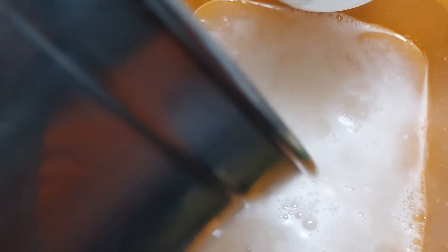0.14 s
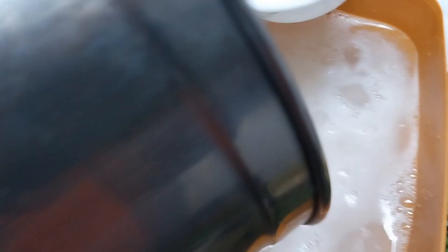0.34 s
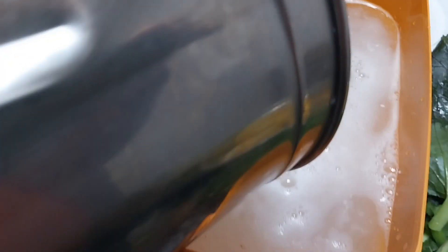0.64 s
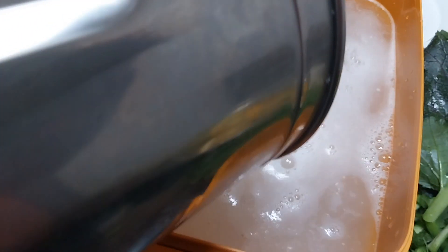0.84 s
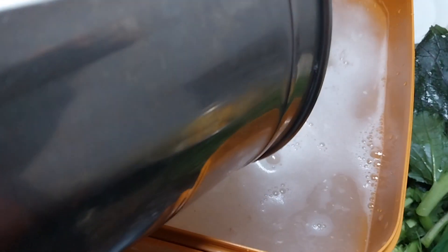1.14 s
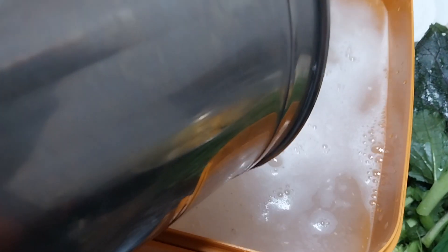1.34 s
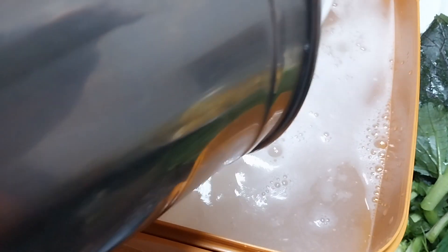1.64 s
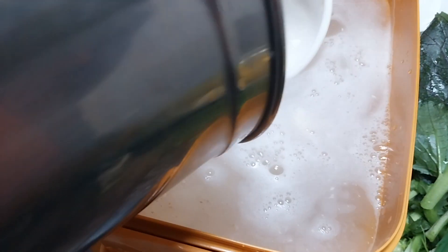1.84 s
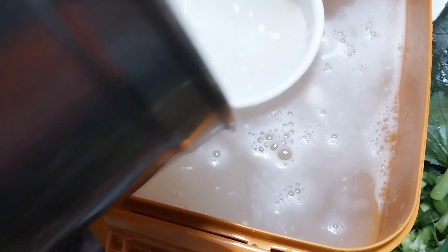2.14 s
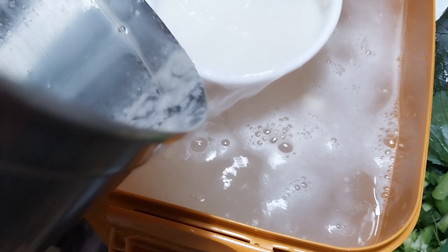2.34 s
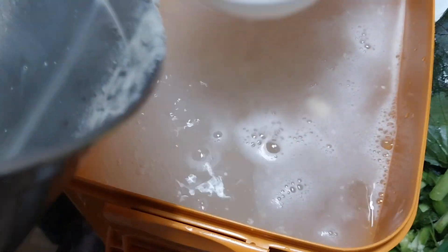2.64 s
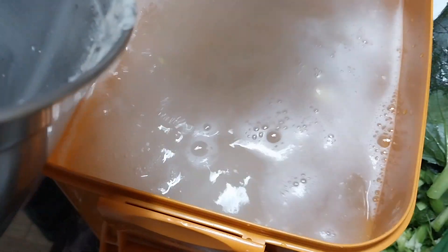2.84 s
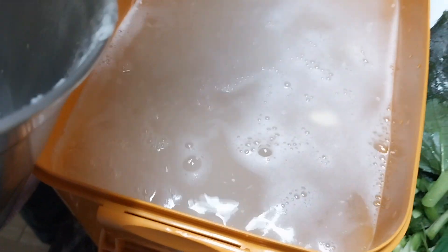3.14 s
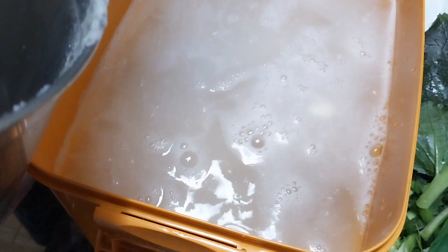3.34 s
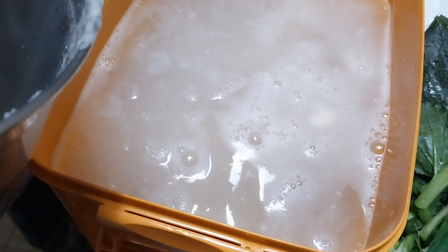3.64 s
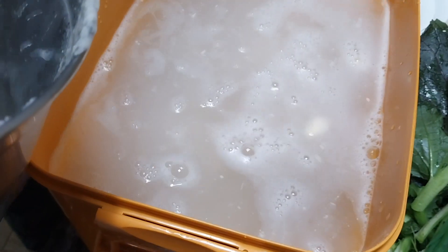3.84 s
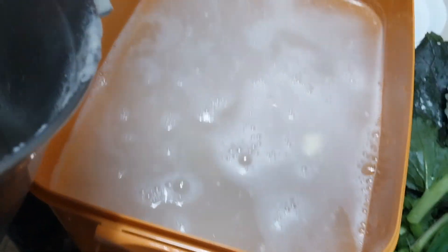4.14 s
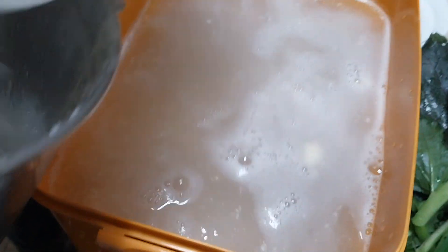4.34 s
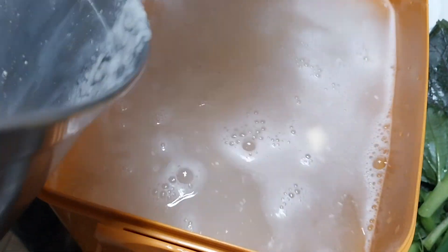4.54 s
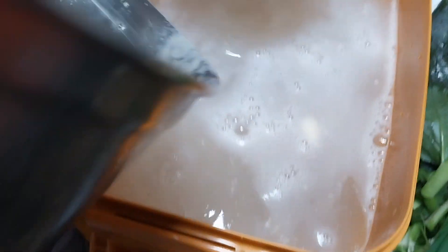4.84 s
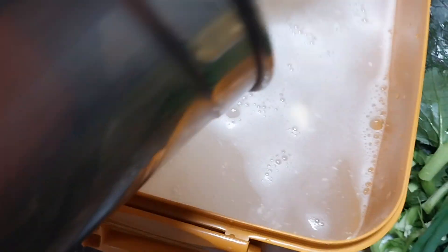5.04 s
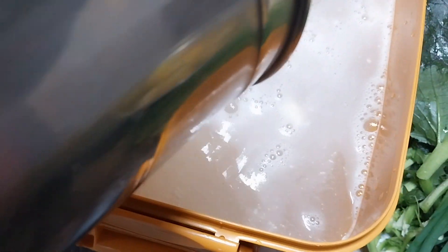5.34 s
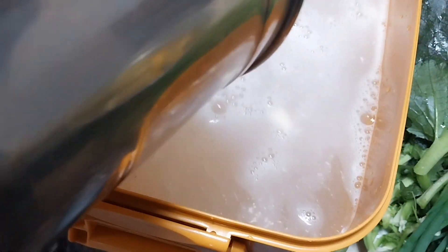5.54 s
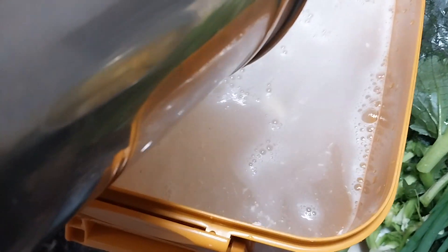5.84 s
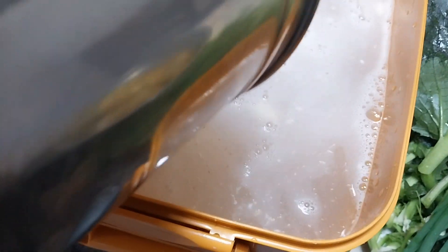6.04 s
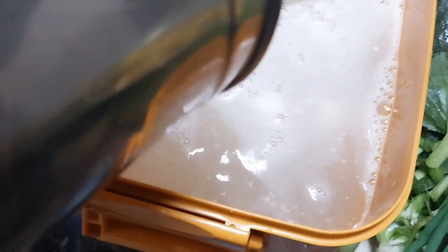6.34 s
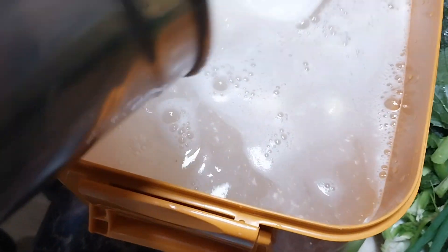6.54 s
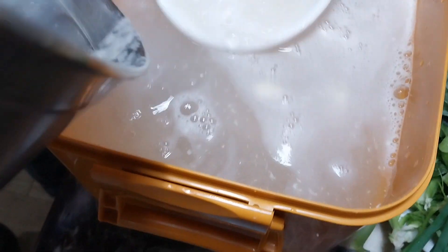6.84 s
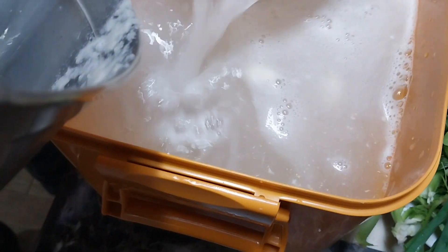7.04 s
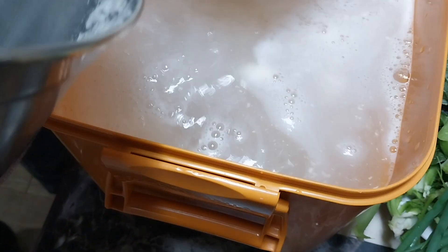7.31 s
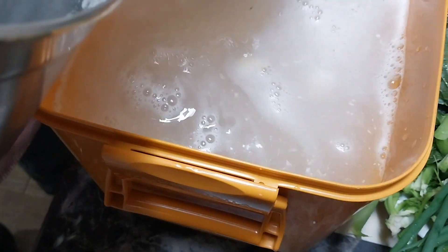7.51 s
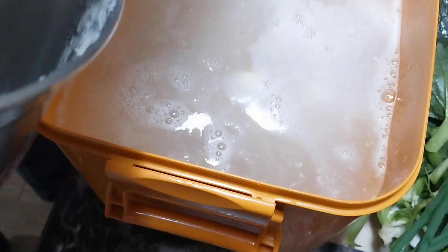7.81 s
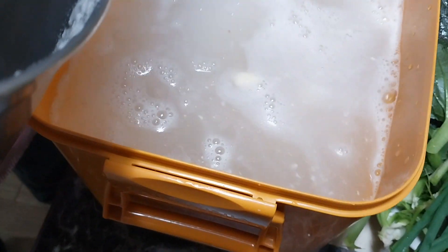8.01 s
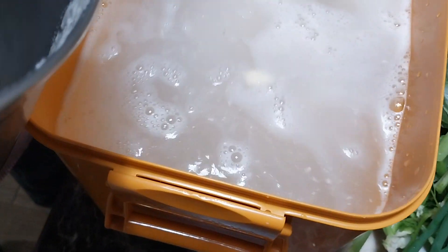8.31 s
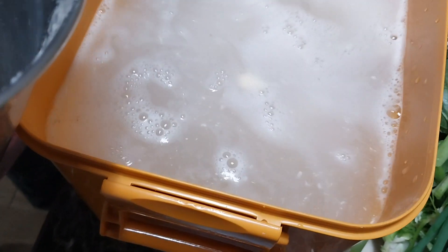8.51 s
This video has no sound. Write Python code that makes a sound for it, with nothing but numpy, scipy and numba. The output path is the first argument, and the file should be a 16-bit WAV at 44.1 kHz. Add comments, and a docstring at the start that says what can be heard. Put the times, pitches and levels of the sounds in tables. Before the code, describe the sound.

Water is scooped and poured from a metal pot into a plastic tub, with soft sloshes, knocks and two gurgling, splashing pours.

```python
"""A tiled kitchen, two microphones close to a plastic tub where a metal pot scoops and pours water.
Crowds of air bubbles gurgle and fizz in two pours and the sloshes around them; the stream drums on the
tub. Plinks sound, mostly single bubbles; droplets tick, foam bursts, and knocks set pot and tub ringing.
The water shifts between left and right. Behind it a fridge hums over faint room noise."""
import sys
import numpy as np
from scipy import signal
from scipy.fft import rfft, irfft, next_fast_len
from scipy.io import wavfile
from scipy.ndimage import uniform_filter1d, map_coordinates
from numba import njit

SR = 44100
rng = np.random.default_rng(int(sys.argv[2]) if len(sys.argv) > 2 else 0)


def transcribe(u):
    """Save the signal u as a 16-bit wav file named by the first command-line argument.

    u: samples, shape (n,) or (channels, n), limited to [-1, 1]; the rate is SR.
    q: integer samples, one column per channel.
    """
    v = np.clip(np.atleast_2d(u).T, -1, 1)
    q = np.round(v * 32767).astype(np.int16)
    wavfile.write(sys.argv[1], SR, q)


N = 382347

# Two pours at close range, a list for each. Each row: time in seconds, gurgle in dB, fizz in dB.
POURS = [
    [(3.41, -76, -60), (3.49, -66.5, -45), (3.62, -48.5, -44), (3.77, -32, -34), (3.89, -28.5, -33.5),
     (4.01, -39.5, -41.5), (4.09, -37, -39), (4.18, -58, -47.5), (4.24, -43, -55.5), (4.27, -57, -52.5),
     (4.33, -45, -63), (4.42, -50, -47.5), (4.44, -77, -80)],
    [(8.04, -88, -75.5), (8.1, -87.5, -54), (8.13, -70, -39.5), (8.29, -47, -32.5), (8.37, -46, -37.5),
     (8.42, -36, -33), (8.54, -34.5, -35), (8.62, -27, -37), (8.64, -32, -51), (8.67, -23.5, -32.5)],
]
# The pot moving through the water. Each row: start and hold in seconds, gurgle in dB, fizz in dB.
SLOSHES = [(0.07, 0.019, -88, -74), (0.75, 0.19, -57, -64), (1.16, .17, -84, -75), (1.62, 0.23, -79, -74.5),
           (2.056, 0.17, -56.5, -69), (2.38, 0.04, -58, -64), (2.576, 0.078, -70, -67),
           (5.367, 0.28, -57, -65.5), (5.677, 0.33, -65.5, -68.5), (6.82, 0.28, -70.5, -71),
           (7.114, 0.13, -65, -58.5)]
# Foam bursting on the surface. Each row: start and hold in seconds, level in dB.
FOAMING = [(0.752, 0.85, -85.5), (1.498, 0.3, -84), (2.024, 1.18, -78.5), (5.396, 2.04, -75.5),
           (7.75, .25, -83)]

def flow():
    """Pours, sloshes and foam add up to a gurgle level and a fizz level, in dB for every sample."""
    t = np.arange(N) / SR
    start, hold, *levels = np.transpose(SLOSHES)
    gain = np.array([swells(start, hold, db) for db in levels])
    gain[1] += swells(*np.transpose(FOAMING))
    for pour in POURS:
        at, *levels = np.transpose(pour)
        gain += np.array([undb(np.interp(t, at, db, -130, -130)) for db in levels])
    return 20 * np.log10(uniform_filter1d(gain, 200, axis=1) + 1e-7)


# Churning water, heard from beside the tub. Each row: frequency in Hz, level in dB.
GURGLE_SPECTRUM = [(88, -50), (150, -21), (522, -28.5), (811, -35), (1120, -5.5), (1300, -8.5),
                   (1660, -0.5), (1820, -5), (2400, 2), (2740, -8.5), (5000, -15.5), (6500, -50),
                   (11000, -120)]

def gurgle(flow_db):
    """Moving water traps a crowd of mid-sized bubbles."""
    return undb(flow_db) * bubble_cloud(440, 6000, GURGLE_SPECTRUM, count=7000, cycles=12,
                                        scatter_db=3, wash_db=-9.5, clump_db=6)


# Spray and foam, close up. Each row: frequency in Hz, level in dB.
SPRAY_SPECTRUM = [(700, -42), (1100, -20), (2500, -14), (3050, -17.5), (3900, -13), (8400, -14.5),
                  (14300, -8.5), (15800, -15), (16500, -36)]
FOAM_SPECTRUM = [(1500, -33), (3200, -24), (4300, -10.5), (5500, -1), (7000, -2.5), (8500, -12.5),
                 (11000, 0), (15000, -2), (16500, -17.5)]

def fizz(level_db, shared=0.12, crossover_db=-52.5):
    """Tiny surface bubbles, only partly shared by the microphones: spray when loud, foam when faint."""
    flat = [(2000, 0), (16000, 0)]
    both, left, right = (bubble_cloud(2400, 16000, flat, count=7000, cycles=12,
                                      scatter_db=7.5, wash_db=-5, clump_db=5) for _ in range(3))
    grains = np.sqrt(shared) * both + np.sqrt(1 - shared) * np.array([left, right])
    spray = unit(colour(grains + undb(-3) * rng.standard_normal((2, N)), SPRAY_SPECTRUM))
    foam = unit(colour(grains, FOAM_SPECTRUM) * undb(4 * walk(30)))
    spray_share = 1 / (1 + undb(crossover_db - level_db))
    return undb(level_db) * (spray_share * spray + (1 - spray_share) * foam)


# Short pitched plinks in the tub, mostly bubbles, a few the ping of a knock.
# Each row: start in seconds, level in dB, pitch in Hz.
PLINKS = [(0.703, -45, 1054), (0.754, -47, 1610), (0.768, -44, 2064), (0.813, -47.5, 736),
          (0.849, -48, 940), (0.88, -44.5, 1500), (0.92, -42.5, 1553), (0.956, -43, 670),
          (0.987, -47.5, 1910), (1.299, -65, 980), (1.414, -58, 714), (1.595, -45, 1220),
          (2.093, -41.5, 600), (2.126, -46, 620), (2.199, -45, 2010), (2.224, -48, 1250),
          (2.241, -47, 1240), (2.283, -52, 854), (2.381, -53, 2040), (2.409, -46, 1770), (2.461, -33, 2030),
          (2.856, -53, 2130), (2.878, -52, 2210), (2.906, -53, 1900), (2.965, -59.5, 1820),
          (3.014, -55, 1690), (3.037, -52.5, 1810), (3.421, -48, 1165), (3.541, -39, 1400),
          (3.554, -23.5, 2062), (3.657, -23.5, 2300), (3.712, -25, 2290), (3.756, -6, 2420),
          (3.78, -7, 1168), (3.851, -16, 1500), (4.023, -26, 2270), (4.041, -28.5, 1820),
          (4.063, -26, 2630), (4.174, -31, 2580), (4.202, -29, 2490), (4.243, -33.5, 2046),
          (4.284, -34, 1386), (4.35, -41, 1470), (4.388, -44, 1320), (4.412, -38, 2170), (4.453, -24, 1880),
          (5.181, -41, 1208), (5.377, -37.5, 605), (5.455, -36, 872), (5.539, -44, 886), (5.658, -47, 1460),
          (5.684, -41, 694), (5.725, -45, 1440), (5.798, -44.5, 725), (5.851, -41.5, 1190),
          (5.896, -47, 738), (5.973, -50, 774), (6.081, -47, 709), (6.394, -49.5, 1600), (6.845, -48, 1350),
          (6.862, -46.5, 1695), (6.904, -43.5, 1545), (7.105, -56.5, 652), (7.145, -54.5, 625),
          (7.205, -55, 660), (7.25, -65, 643), (7.176, -42.5, 1555), (7.192, -38, 1526), (7.328, -49, 1535),
          (7.403, -38.5, 1207), (8.171, -44, 2230), (8.271, -27.5, 2180), (8.272, -27.5, 1755),
          (8.322, -37, 2360), (8.362, -27, 3550), (8.384, -32.5, 1070), (8.416, -28, 1060),
          (8.412, -25, 3880), (8.43, -23.5, 2070), (8.503, -19, 1390), (8.522, -9, 1638),
          (8.55, -23.5, 2160), (8.603, -18, 1450), (8.614, -23.5, 1590), (8.653, -24, 1530)]

def plinks():
    """Each plink swells, rings and rises in pitch amid fainter neighbours; the tub wall sends it back."""
    at, db, hz = np.transpose(PLINKS)[..., None]
    t60 = .027 * (1000 / hz) ** .22  # lower plinks ring longer, as bigger bubbles do
    delay, pitch, drop = rng.random((len(at), 3, 5)).swapaxes(0, 1)
    first = play(at, hz, undb(db), t60, rise=.002, glide=1.2)
    neighbours = play(at + .018 * delay, hz * .7 * 2.4 ** pitch, undb(db - 5.5 - 17 * drop),
                      .5 * t60, rise=.00021, glide=3.5)
    echo = play(at + .008, hz, undb(db - 11), 1.5 * t60, rise=.002, glide=1.5)
    return first + neighbours + echo


# Droplets landing near the microphones. Each row: start in seconds, level in dB, pitch in Hz.
DROPLETS = [(0.8123, -32, 13800), (0.8525, -44, 11800), (0.891, -38, 6050), (1.003, -45.5, 4300),
            (2.036, -47.5, 6000), (2.093, -38.5, 11100), (2.132, -35, 13800), (2.415, -33.5, 7040),
            (2.446, -39, 5750), (2.4607, -27.5, 4380), (2.729, -48.5, 5330), (2.893, -49.5, 5300),
            (2.979, -51, 5300), (3.1834, -49, 5630), (3.4199, -41, 12100), (3.4417, -31.5, 3660),
            (3.457, -29.5, 3740), (3.4805, -25, 11050), (3.5313, -27, 7500), (3.564, -16.5, 4640),
            (3.67, -30, 13200), (3.727, -13, 6400), (3.7771, -6.5, 12300), (3.8482, -15.5, 6040),
            (4.0276, -19, 4520), (4.081, -19, 11700), (4.2428, -29.5, 7000), (4.288, -34, 8250),
            (4.2961, -26, 3500), (4.326, -32, 4650), (4.3515, -27.5, 3920), (4.387, -36.5, 4200),
            (4.4143, -33, 4200), (5.375, -36.5, 5600), (5.4516, -34.5, 6080), (5.644, -37.5, 5270),
            (5.9277, -41.5, 5460), (6.042, -43, 6260), (6.4445, -43, 5360), (6.71, -48.5, 5570),
            (6.8293, -37.5, 7040), (7.0996, -34.5, 5300), (7.79, -48, 14000), (7.8122, -43, 5480),
            (8.0565, -33.5, 13400), (8.113, -21, 12500), (8.1315, -15.5, 4770), (8.1784, -18.5, 9650),
            (8.259, -22.5, 6600), (8.3624, -13.5, 3540), (8.499, -15, 4460), (8.519, -12, 13100),
            (8.553, -15.5, 3800), (8.5897, -18, 5100), (8.6037, -10, 3480), (8.6207, -27, 3800)]

def droplets():
    """A droplet is a soft click and one main bubble; each microphone catches its own splatter."""
    at, db, hz = np.transpose(DROPLETS)
    click = colour(burst(at, db - 3, t60=.09), SPRAY_SPECTRUM)
    bubble = play(at, hz, undb(db - 4.5), t60=.01, rise=.0004, glide=2.8)
    splatter = []
    for delay, spread, drop in rng.random((len(at), 2, 3, 10)).transpose(1, 2, 0, 3):
        late = at[:, None] + .006 * delay ** 2
        pitch = 2800 * 12 ** spread
        size = undb(db[:, None] - 13.5 - 9.9 * drop)
        splatter.append(play(late, pitch, size, t60=24 / pitch, rise=3 / pitch, glide=7.9))
    return click + bubble + np.array(splatter)


# Pot or water striking the tub. Each row: start in seconds, level in dB, the tub's thud in relative dB.
KNOCKS = [(0.423, -36.5, 1.5), (0.546, -46.5, 5.5), (0.705, -47, -1.5), (1.414, -52.5, -11),
          (1.592, -46, 2.5), (3.778, -19, -29.5), (3.849, -16.5, -40.5), (4.455, -5.5, -14.5),
          (5.184, -48, -18), (5.684, -42, -3.5), (5.798, -51, 4), (5.895, -40.5, -4.5), (5.973, -43.5, -8),
          (6.081, -43.5, -5.5), (6.199, -51, -2.5), (6.288, -57, -1.5), (6.392, -45, -12.5),
          (6.524, -54, -9.5)]
# Modes of pot and tub. Each row: pitch in Hz, level in dB, ring time in seconds (capped below).
POT_MODES = [(570, -17, 0.11), (645, -10, 0.42), (910, -10, 0.067), (1100, -0.5, 0.29), (1251, 5.5, 0.19),
             (1720, -4.5, 0.1), (1910, -10.5, 0.87), (2093, 2, 0.97), (2429, -9.5, 0.35),
             (2650, -31.5, 0.38), (2950, -27, 0.3), (4150, -21, 0.2), (5240, -24, 0.3), (4440, -32.5, 0.28)]
TUB_MODES = [(75, -5.5, .15), (111, -4, 0.25), (159, 2.5, 0.05), (225, 1.5, 0.06), (260, -3, .2),
             (312, -2.5, .25), (326, -1, .3), (438, -2, .3)]

def knocks(longest_ring_s=.33):
    """Every blow cracks, clatters and shakes the modes of pot and tub in new proportions."""
    at, db, thud_db = np.transpose(KNOCKS)[..., None]
    # a harder blow cracks more and favours higher tub modes
    crack = colour(burst(at, 2.15 * db - .5, t60=.021),
                   [(150, -31.5), (400, 14.5), (1200, 6.5), (2500, 4.5), (5000, 2.5), (16000, -11)])
    favoured_hz = 380 * 2 ** (.02 * db)
    tub_db = db + thud_db - 6 - 18 * np.abs(np.log2(np.array(TUB_MODES)[:, 0] / favoured_hz))
    clatter = burst(at, db - 2.5, t60=.082) + burst(at, db - 16.5, t60=.27)
    out = crack + colour(clatter, [(150, -26), (300, -5.5), (650, -3.5), (800, -7), (1200, 8),
                                   (2300, -.5), (2900, -18), (5000, -25.5), (16000, -49)])
    for modes, blow_db, touch_s, ring_db in ((POT_MODES, db - 18, .04, -12.5), (TUB_MODES, tub_db, .1, -5)):
        hz, mode_db, t60 = np.transpose(modes)
        strength, delay, detune = rng.standard_normal((len(at), 3, len(hz))).swapaxes(0, 1)
        size = undb(blow_db + mode_db + 1.5 * strength)
        late = at + .0012 * np.abs(delay)
        hz = hz * (1 + .0076 * detune)
        # most of the blow dies while the two still touch; a soft blow damps the remaining ring less
        out += play(late, hz, size, touch_s, rise=.002)
        ring_size = size * undb(ring_db - .1244 * db)
        out += play(late, hz, ring_size, np.minimum(t60, longest_ring_s), rise=.00095)
    return out


# Glugs down in the tub. Each row: start in seconds, level in dB.
GLUGS = [(.55, -73), (.81, -64), (.95, -74), (1.41, -78), (2.09, -58), (3.76, -58), (4.275, -59),
         (4.319, -56), (4.42, -67), (5.37, -47.5), (5.68, -56), (5.8, -56), (5.89, -62), (6.08, -68),
         (7.13, -68), (7.21, -69.5), (8.41, -60), (8.5, -54), (8.61, -60)]
# Their tone. Each row: frequency in Hz, level in dB.
GLUG_SPECTRUM = [(300, -35), (480, -5), (620, -3), (750, -3), (950, -20), (1500, -47)]

def glugs():
    """Big air pockets ring low in short swells."""
    at, db = np.transpose(GLUGS)
    pockets = bubble_cloud(480, 850, GLUG_SPECTRUM, count=1200, cycles=14,
                           scatter_db=7, wash_db=-7.5, clump_db=4.5)
    return pockets * swells(at, 0, db, attack_s=.011, fade_db_s=149.5)


# The tub under the stream. Each row: frequency in Hz, level in dB.
DRUM_SPECTRUM = [(40, -22), (100, -5.5), (200, -6.5), (380, 4), (520, -7), (900, -45.5)]

def drumming(flow_db):
    """Falling water drums on the tub, but only a strong stream does so audibly."""
    level_db = -11.5 + 1.5 * flow_db + 2.5 * walk(25)
    return undb(level_db) * unit(colour(rng.standard_normal(N), DRUM_SPECTRUM))


# The kitchen's reflections at the tub. Each row: frequency in Hz, gain in dB.
ROOM_SPECTRUM = [(100, 8), (1000, -2.5), (2500, -3.5), (3500, -3.5), (8000, -4.5), (16000, -8.5)]

def reflections(x):
    """Quick scatter off tub and pot, then the tiles: separate noise tails for each microphone."""
    t = np.arange(SR // 2) / SR
    tail = np.zeros((2, N))
    for t60, db, rise in ((.026, .5, .001), (.36, -5.5, .012)):
        part = rng.standard_normal((2, len(t))) * 1000 ** (-t / t60) * np.minimum(t / rise, 1)
        tail[:, :len(t)] += undb(db) * unit(part) / np.sqrt(len(t))
    return signal.fftconvolve(x[None], colour(tail, ROOM_SPECTRUM)[:, :len(t)], axes=1)[:, :N]


# The fridge in the background, a little to the left. Each row: frequency in Hz, level in dB.
FRIDGE_HUM = [(59.9, -77.5), (119.8, -59.5), (179.7, -79), (239.6, -80), (359.4, -87)]

def fridge():
    """Mains harmonics hum, wavering slightly in level."""
    t = np.arange(N) / SR
    waver = undb(1.1 * walk(4))
    hum = sum(undb(db) * np.sin(2 * np.pi * (hz * t + rng.random())) for hz, db in FRIDGE_HUM)
    return np.sqrt(2) * waver * hum * undb([[1.8], [-1.8]])


# Room tone all around. Each row: frequency in Hz, level in dB.
ROOM_TONE_SPECTRUM = [(20, -25), (50, -12.5), (85, -17), (130, -17.5), (250, -17), (480, -32.5), (700, -36),
                      (1000, -42.5), (3200, -52), (6000, -48.5), (14800, -43.5), (16500, -55)]

def room_tone():
    """Faint noise, shared by the microphones mostly in the bass; the treble flickers."""
    mid, side = rng.standard_normal((2, N))
    side = colour(side, [(60, -7), (600, -4), (16000, 3.5)])
    air = undb(-66) * unit(colour(np.array([mid + side, mid - side]), ROOM_TONE_SPECTRUM))
    treble = signal.lfilter(*signal.butter(1, 1500, "high", fs=SR), air)
    return air + treble * (undb(2 * walk(12)) - 1)


# Dips in the background. Each row: start and hold in seconds, share of the amplitude lost.
DIPS = [(4.902, 0.62, 0.27), (7.5, 0.41, 0.19)]

def background(ramp_s=.1):
    """Fridge and room tone dip briefly, twice."""
    t = np.arange(N) / SR
    dip = sum(lost * np.clip(np.minimum(t - at, at + hold - t) / ramp_s + 1, 0, 1)
              for at, hold, lost in DIPS)
    return (1 - dip) * (fridge() + room_tone())


def bubble_cloud(low_hz, top_hz, spectrum, count, cycles, scatter_db, wash_db, clump_db):
    """Dense bubbles of unequal size, each chirping upward, in clumps over a wash of unresolved ones."""
    when, pitch, strength, length = rng.random((count, 4)).T
    hz = low_hz * (top_hz / low_hz) ** pitch
    size = undb(-scatter_db * np.log(strength + .04))
    grains = play(when * N / SR, hz, size, t60=cycles * (.5 + length) / hz, rise=2 / hz, glide=.012 * hz)
    wash = colour(rng.standard_normal(N), [(low_hz, 0), (top_hz, -3 * np.log2(top_hz / low_hz))])
    cloud = colour(unit(grains) + undb(wash_db) * unit(wash), spectrum)
    return unit(cloud * undb(clump_db * walk(45)))


def swells(starts, holds, db, attack_s=.014, fade_db_s=150):
    """Summed gain of events that rise, hold and fade."""
    grid = np.arange(0, N, 64)
    age = grid / SR - starts[:, None]
    fading_s = np.maximum(age - attack_s - np.asarray(holds)[..., None], 0)
    gain = np.clip(age / attack_s, 0, 1) ** 2 * undb(db[:, None] - fade_db_s * fading_s)
    return np.interp(np.arange(N), grid, gain.sum(axis=0))


def burst(at, db, t60):
    """Noise bursts with a sharp start."""
    hits = np.zeros(N)
    hits[(at * SR).astype(int)] = undb(db)
    return signal.lfilter([1], [1, -1000 ** (-1 / (t60 * SR))], hits) * rng.standard_normal(N)


def play(at, hz, size, t60, rise, glide=0):
    """Broadcast the settings and ring one damped sine for each entry."""
    columns = np.broadcast_arrays(at, np.minimum(hz, SR / 2.5), size, t60, np.maximum(rise, 1 / SR), glide)
    return rings(*(np.ascontiguousarray(c, float).ravel() for c in columns), N)


@njit
def rings(at, hz, size, t60, rise, glide, n):
    """Sum of damped sines that swell over rise seconds and climb by glide times their pitch a second."""
    out = np.zeros(n)
    for e in range(len(at)):
        phase, gain, start = 0., size[e], int(at[e] * SR)
        fade = 1000 ** (-1 / (t60[e] * SR))
        for i in range(min(int((rise[e] + t60[e]) * SR), n - start)):
            t = i / SR
            phase += 2 * np.pi * hz[e] * (1 + glide[e] * t) / SR
            if t > rise[e]:
                gain *= fade
            out[start + i] += gain * min(t / rise[e], 1.) ** 2 * np.sin(phase)
    return out


def colour(x, points):
    """Filter by (Hz, dB) points joined on a log axis."""
    hz, db = np.transpose(points)
    size = next_fast_len(N)
    f = np.maximum(np.fft.rfftfreq(size, 1 / SR), 1)
    return irfft(rfft(x, size) * undb(np.interp(np.log(f), np.log(hz), db)), size)[..., :N]


def walk(rate):
    """Random levels held 1 / rate seconds and smoothed twice; rms 1."""
    hold = int(SR / rate)
    steps = np.repeat(rng.standard_normal(N // hold + 1), hold)
    return unit(uniform_filter1d(uniform_filter1d(steps, hold), hold)[:N])


def undb(db):
    """dB to gain."""
    return 10 ** (np.asarray(db) / 20)


def unit(x):
    """Scale to rms 1."""
    return x / np.sqrt(np.mean(x ** 2))


# The water's place as the pot moves between mid tub and the left rim.
# Each row: time in seconds, lag at the right microphone in milliseconds, left minus right in dB.
POSITION = [(0, 0.14, 8), (1.4, 0.021, -13), (1.55, 0.45, 4.5), (2, 0.13, -4.5), (2.8, 0.17, 7),
            (3, 0.51, 3), (4.4, 0.51, 9.5), (4.899, 0.5, -1.5), (5.3, 0.098, -2.5), (7.8, .14, -0.5),
            (8, 0.44, 4.5), (8.67, 0.53, 11)]

def scene():
    """Water and knocks reach the left microphone first; the right one hears them later and duller."""
    flow_db, fizz_db = flow()
    stream = gurgle(flow_db) + glugs() + drumming(flow_db) + fizz(fizz_db)
    left, right = stream + plinks() + droplets() + knocks()
    t = np.arange(N) / SR
    at, lag_ms, pan_db = np.transpose(POSITION)
    lag = np.interp(t, at, lag_ms) * SR / 1000
    pan_db = np.interp(t, at, pan_db)
    right = map_coordinates(right, [np.arange(N) - lag], order=3)
    right = signal.lfilter(*signal.butter(1, 9620, fs=SR), right)
    direct = np.array([left * undb(1 + pan_db / 2), right * undb(1 - pan_db / 2)])
    return direct + reflections(left) + background()


def record(dry):
    """The recorder drops the deepest bass, clips at full scale and cuts the top."""
    x = signal.lfilter(*signal.butter(1, 45, "high", fs=SR), dry)
    return signal.sosfilt(signal.ellip(12, .2, 110, 15900, fs=SR, output="sos"), np.clip(x, -1, 1))


dry = scene()
out = record(dry)
transcribe(out)
```